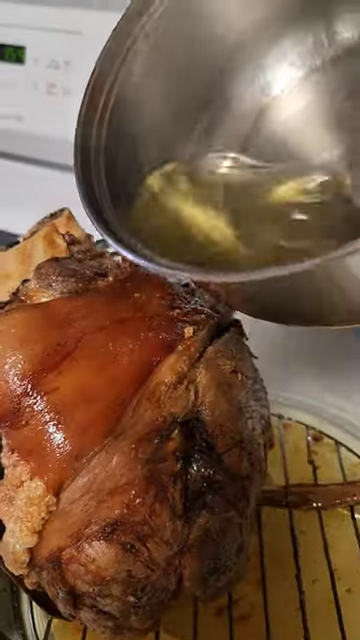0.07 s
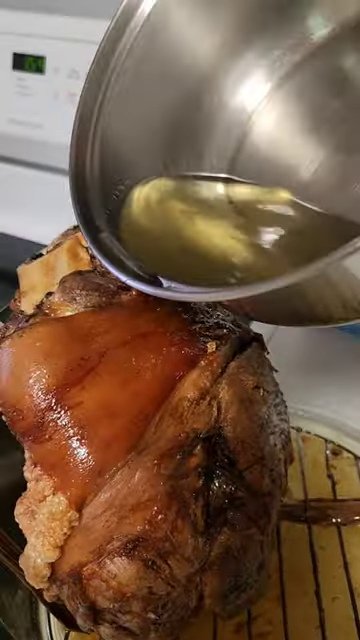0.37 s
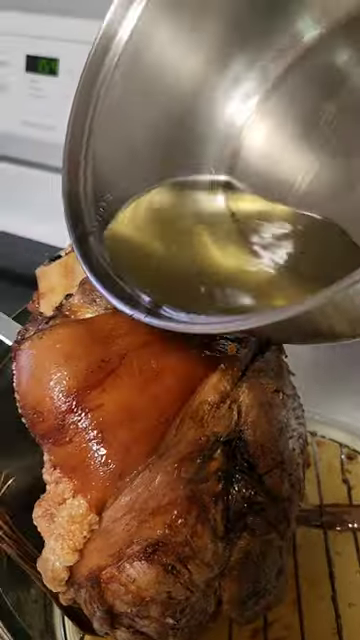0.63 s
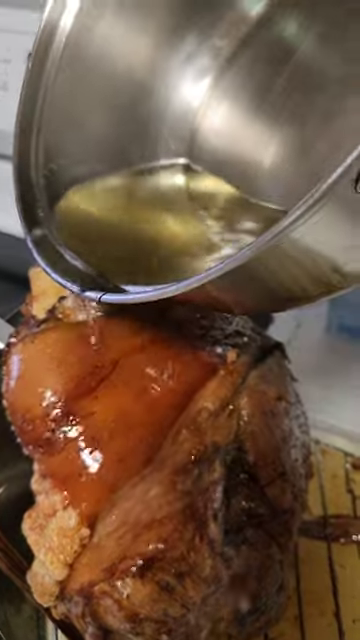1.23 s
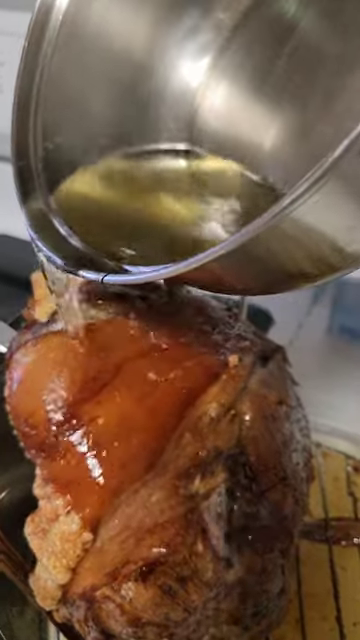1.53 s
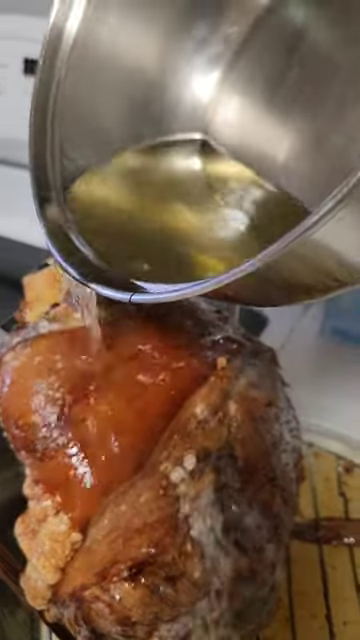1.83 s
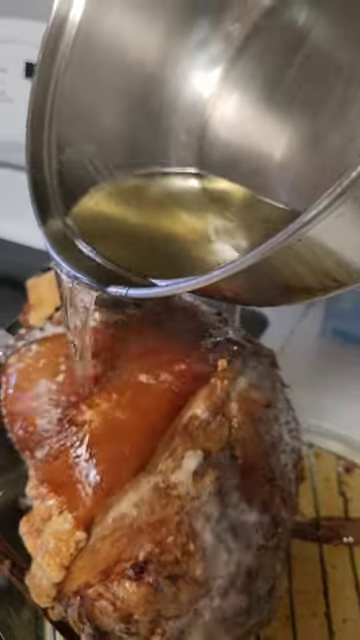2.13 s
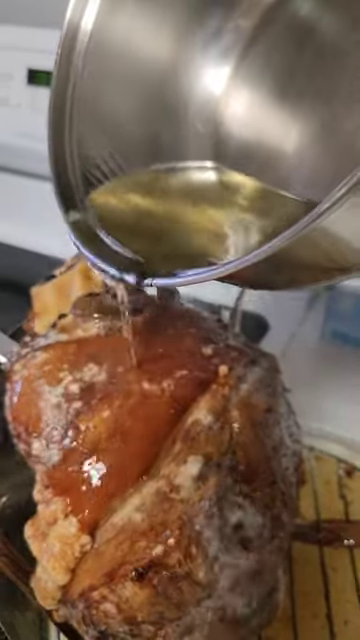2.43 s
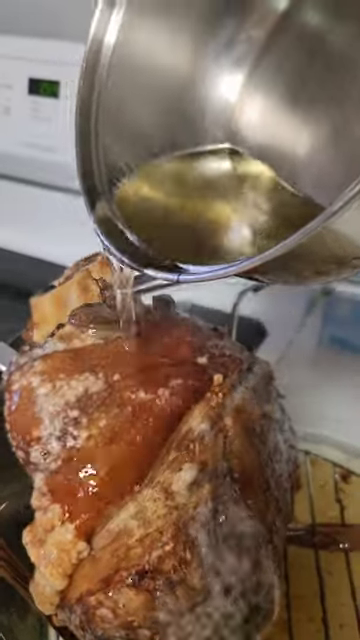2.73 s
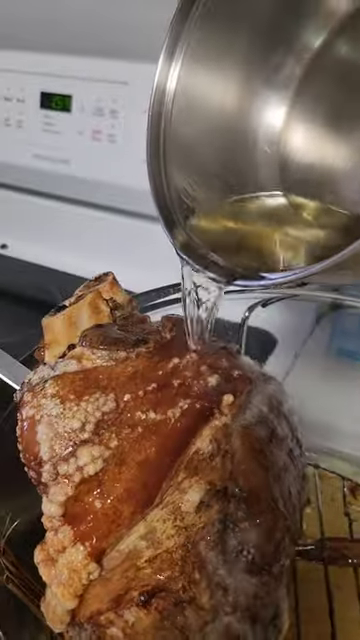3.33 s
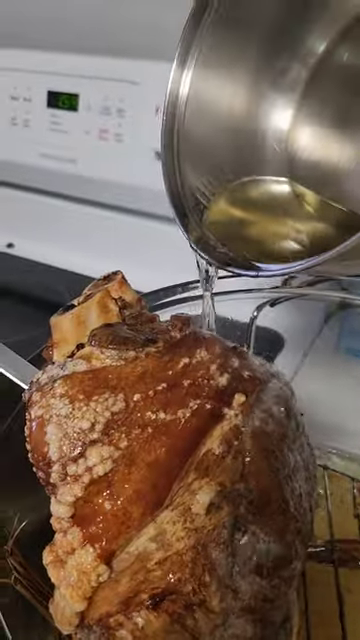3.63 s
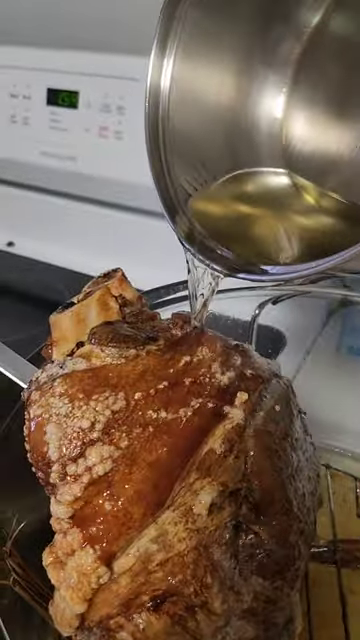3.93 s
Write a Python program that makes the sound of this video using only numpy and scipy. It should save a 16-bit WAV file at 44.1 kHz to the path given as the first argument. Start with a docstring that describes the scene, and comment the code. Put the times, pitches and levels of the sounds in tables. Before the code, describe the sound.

Close, bright sizzle and popping as hot oil is poured over roast pork skin.

```python
"""Hot oil on roast pork

Hot oil is poured from a steel pot over roast pork, close to a phone in a small kitchen where an appliance
hums. A few drops spit, then the stream lands: moisture in the skin boils off as fizz, crackle and lower
pops, and the hollow of the pot resonates. Blisters crack, pockets of fat pop and air thuds on the
microphone. Near the end the level dips briefly."""
import sys
import numpy as np
from scipy import signal
from scipy.fft import rfft, irfft
from scipy.io import wavfile
from scipy.ndimage import uniform_filter1d

SR = 44100
rng = np.random.default_rng(int(sys.argv[2]) if len(sys.argv) > 2 else 0)


def int16_out(signal):
    """Quantize to a 16-bit WAV file."""
    q = np.round(np.clip(np.atleast_2d(signal).T, -1, 1) * 32767)
    wavfile.write(sys.argv[1], SR, q.astype(np.int16))


N = 176400
T = np.arange(N) / SR
ROOM_T60_S, PORT_LAG_S = .065, .0001  # reverberation time; later arrival at the left microphone port


def undb(db):
    """Amplitude ratio: a factor of ten for every 20 dB."""
    return 10 ** (np.asarray(db) / 20)


def unit(x):
    """Normalisation to an rms of 1."""
    return x / np.sqrt(np.mean(x ** 2))


def curve(table, column=1):
    """Linear interpolation of one column over time."""
    rows = np.array(table)
    return np.interp(T, rows[:, 0], rows[:, column])


def pan(left_db):
    """Constant-power panning: two gains from a left-right level difference."""
    gains = undb(np.array([[.5], [-.5]]) * left_db)
    return gains / np.sqrt(np.mean(gains ** 2, axis=0))


def drift(rate_hz):
    """Low-pass noise: a smooth random fluctuation of rms 1."""
    width = max(int(SR / rate_hz), 1)
    smoothed = uniform_filter1d(rng.standard_normal(N), width, mode="wrap")
    return unit(uniform_filter1d(smoothed, width, mode="wrap"))


def colour(x, points, size=8192):
    """Minimum-phase filtering through points of f/Hz, gain/dB."""
    hz, db = np.array(points).T
    f = np.arange(size // 2 + 1) * SR / size
    gain = undb(np.interp(np.log(f + 1), np.log(hz), db))
    cepstrum = irfft(np.log(gain))
    cepstrum[1:size // 2] *= 2  # folding makes the response causal
    response = irfft(np.exp(rfft(cepstrum[:size // 2], size)))
    return signal.fftconvolve(np.atleast_2d(x), response[None], axes=1)[:, :N]


def kitchen(x, echo_db, t60_s=ROOM_T60_S, onset_s=.00055, spots=6, block=128):
    """Diffuse reflection from stove and walls: each spot on the roast has its own decaying response."""
    t = T[:N // 16]
    decay = np.exp(-np.log(1000) * t / t60_s) * np.clip(t / onset_s, 0, 1)
    active_spot = np.repeat(rng.integers(0, spots, N // block + 1), block)[:N]
    echo = 0
    for spot in range(spots):
        tail = rng.standard_normal((2, len(t))) * decay / np.sqrt(np.sum(decay ** 2))
        share = np.sin(np.pi / 2 * uniform_filter1d(1. * (active_spot == spot), block))
        echo = echo + signal.oaconvolve(x * share, tail, axes=1)[:, :N]
    return x + undb(echo_db) * echo


# Spectral density of the appliance's air noise: f/Hz, relative level/dB
AIR_SPECTRUM = [(15, -28), (25, -10.5), (48, -4.5), (74, -8), (110, 0.5), (155, -4.5), (200, -16.5),
                (264, -15), (335, -25), (382, -22.5), (440, -31.5), (569, -25.5), (761, -34), (1440, -31.5),
                (1820, -35.5), (2200, -35.5), (3500, -43), (4400, -41), (5500, -49), (6600, -46.5),
                (8000, -57), (10000, -58), (14000, -73)]
# Side signal of that noise relative to the mid signal: f/Hz, level/dB
AIR_SIDE = [(60, -18), (130, -16.5), (300, -11.5), (1000, 0), (3000, 0)]
# Motor partials: f/Hz, relative level/dB
MOTOR_PARTIALS = [(125, -35.5), (376, -56.5), (742, -63.5)]
# Envelope of air and motor together: t/s, gain/dB
HUM_ENVELOPE = [(0, -0.5), (0.7, 0.5), (1.6, -0.5), (2.5, 0.5), (3.5, 1.5), (3.63, -2.5), (3.66, -7),
                (4, -3)]


def appliance(air_db=-29.5):
    """Broadband air noise plus a motor's line spectrum, wavering in amplitude and phase."""
    mid, side = unit(colour(rng.standard_normal((2, N)), AIR_SPECTRUM))
    air = undb(air_db) * (mid + np.array([[1], [-1]]) * colour(side, AIR_SIDE))
    motor = 0
    for hz, db in MOTOR_PARTIALS:
        amplitude = np.sqrt(2) * undb(db + 3.0 * drift(2.7))
        motor = motor + amplitude * np.sin(2 * np.pi * hz * T + 1.26 * drift(8.4))
    return (air + motor) * undb(curve(HUM_ENVELOPE)) * pan(left_db=2.5)


# First drops: t/s, duration/s, level/dB
SPITS = [(0.061, .035, -54), (0.284, .048, -52), (0.5065, .0025, -28), (0.603, .016, -46.5),
         (0.639, .003, -50), (0.719, .003, -38), (0.795, .05, -50), (0.8545, .006, -20), (0.864, .02, -37),
         (0.885, .005, -28)]
# Spectrum of their hiss: f/Hz, relative level/dB
SPIT_SPECTRUM = [(1000, -17), (3000, -13), (6000, -7), (9000, -3.5), (13000, 0), (15500, 0)]


def spits(attack_share=.3, release_share=.3):
    """Flash boiling: each stray drop gives a short, bright hiss that decays exponentially."""
    envelope = 0
    for start, length, db in SPITS:
        attack = np.clip((T - start) / (attack_share * length), 0, 1)
        release = np.exp(-np.maximum(T - start - length, 0) / (release_share * length))
        envelope = envelope + undb(db) * attack * release
    hiss = unit(colour(rng.standard_normal((2, N)), SPIT_SPECTRUM))
    return kitchen(envelope * hiss, echo_db=-10)


def bursts(times, hz, gains, q, scatter, lags_s, scatter_s=.00065, size=256):
    """Damped resonators, each excited by an impulse and its glancing echoes from meat and pot."""
    snap = scatter * rng.standard_normal((len(times), 2, size)) * np.exp(-T[:size] / scatter_s)
    snap[:, :, 0] = 1  # direct sound
    f = np.arange(size // 2 + 1) * SR / size
    s = 1j * f / hz[:, None]
    resonance = s / q / (1 + s / q + s * s)
    wave = irfft(rfft(snap) * resonance[:, None])
    wave /= np.sqrt((wave ** 2).sum(axis=2).mean(axis=1))[:, None, None]  # unit energy
    channels = []
    for side, arrivals in enumerate((times + lags_s, times)):
        samples = (np.abs(arrivals) * SR).astype(int)[:, None] + np.arange(size)
        pressure = wave[:, side] * gains[side][:, None]
        channels.append(np.bincount(samples.ravel(), pressure.ravel(), N)[:N])
    return np.array(channels)


def bubbles(count, centre_hz, octaves, q, spread_db, cap_db=12.5, width_db=5):
    """Shot noise of steam bubbles; a level spread gives many weak bursts and a few strong ones."""
    when, rank = rng.random((count, 2)).T
    pitch, place = rng.standard_normal((count, 2)).T
    hz = centre_hz * 2 ** (octaves * pitch)
    gains = undb(np.minimum(-spread_db * np.log(rank), cap_db)) * pan(width_db * place)
    lags_s = PORT_LAG_S - .00006 * place  # bubbles lie at different angles to the ports
    return unit(bursts(when * N / SR, hz, gains, q, scatter=.24, lags_s=lags_s))


def pot(x, hz=757, q=9.8, ring_db=10):
    """Cavity resonance: the hollow of the steel pot rings with the frying."""
    return x + undb(ring_db) * signal.lfilter(*signal.iirpeak(hz, q, fs=SR), x)


# Boiling of the skin, in relative levels: t/s, fizz level/dB, crackle level/dB, pop level/dB
BOILING = [(0.88, -39.5, -49, -47), (0.92, -29, -33, -46.5), (1.0, -26, -49, -43.5),
           (1.12, -30, -34.5, -43), (1.25, -27.5, -34, -46.5), (1.41, -29.5, -37.5, -43),
           (1.49, -30.5, -40, -38.5), (1.57, -31.5, -36.5, -46.5), (1.71, -29, -36.5, -46),
           (1.74, -28, -30, -40), (1.95, -21, -30, -42.5), (2.12, -26, -30.5, -41), (2.25, -26.5, -29, -40),
           (2.45, -23, -33.5, -37.5), (2.58, -26, -37.5, -46), (2.76, -23.5, -30, -38.5),
           (3.03, -24.5, -32.5, -42), (3.23, -21.5, -28, -37.5), (3.36, -23, -47, -36.5),
           (3.48, -21.5, -27, -37), (3.55, -26, -34, -39), (3.635, -19.5, -36.5, -34.5),
           (3.66, -23.5, -43, -36.5), (3.85, -26.5, -38.5, -40.5), (4.0, -26, -32, -36)]
# Spectral shaping of the frying: f/Hz, gain/dB
FRYING_RESPONSE = [(250, -3.5), (400, 5), (500, 3.5), (610, -5.5), (920, -5), (1300, 2), (2100, 1.5),
                   (2550, -2), (2900, 0.5), (3200, 2.5), (4000, 0), (4800, 1.5), (6000, -2.5), (7300, -1.5),
                   (10000, -4), (12500, -0.5), (15500, 3.5)]


def frying(lands_s=.825, spreads_s=.059, flutter_db=1.2):
    """Boiling: three bubble swarms add incoherently and flutter as the oil runs over fresh skin."""
    fizz = bubbles(count=5500, centre_hz=7700, octaves=.18, q=1.65, spread_db=0)
    crackle = bubbles(count=1800, centre_hz=4500, octaves=.38, q=1.6, spread_db=2.5)
    pops = bubbles(count=1800, centre_hz=1560, octaves=.7, q=.88, spread_db=3)
    fizz *= undb(curve(BOILING, column=1) - 2 + flutter_db * drift(135))
    crackle *= undb(curve(BOILING, column=2) + flutter_db * drift(68))
    pops *= undb(curve(BOILING, column=3) + 3.5)
    wetted = np.clip((T - lands_s) / spreads_s, 0, 1)
    sizzle = (fizz + crackle + pops) * undb(.33 * drift(47)) * wetted
    return colour(pot(kitchen(sizzle, echo_db=-3.5)), FRYING_RESPONSE)


# Bursting blisters: t/s, relative level/dB, f/Hz, left-right difference/dB
BLISTERS = [(0.9213, -21, 6300, -1), (0.9817, -20, 8000, 0), (0.9935, -20, 6700, 0), (1.0614, -21, 6100, 1),
            (1.1708, -21, 3400, 0), (1.1786, -11.5, 7500, -1), (1.2614, -19.5, 6800, 3),
            (1.2886, -19, 11000, 0), (1.3493, -22, 4700, -1), (1.3815, -15.5, 4700, -2),
            (1.4184, -22.5, 7000, -1), (1.4607, -13, 3800, -2), (1.478, -18, 5900, -2),
            (1.538, -22, 7400, -1), (1.5777, -21, 8000, -2), (1.7482, -18, 4700, 0), (1.7868, -14, 4000, 5),
            (1.7998, -18, 4900, 3), (1.842, -20, 3800, -2), (2.1022, -17, 7500, -2), (2.145, -20, 4500, -2),
            (2.2055, -14, 4200, 1), (2.2228, -14, 5700, 0), (2.2465, -19, 6700, -1), (2.2567, -13, 4200, 1),
            (2.2884, -17, 4300, 1), (2.3154, -18, 7800, 2), (2.3995, -15, 5100, 1), (2.4454, -18, 5300, -1),
            (2.492, -11, 7000, 3), (2.6283, -19, 9800, 4), (2.7197, -16, 3700, 1), (2.8684, -17, 5800, 2),
            (2.9902, -18, 5700, -2), (3.0022, -18, 7300, 1), (3.0718, -20, 5600, 1), (3.3346, -16, 6100, 1),
            (3.3404, -15, 2400, 0), (3.3522, -17, 5400, -2), (3.3804, -15, 7400, -4),
            (3.5129, -18, 4900, 3), (3.6443, -16, 6000, 6), (3.7698, -21, 6500, -1),
            (3.7971, -18, 6000, -4), (3.8779, -19, 6000, -8), (3.9146, -16, 7000, -6),
            (3.9836, -17, 5200, -5)]


def blisters():
    """Impulsive rupture: each blister tears open in about a millisecond with a broadband crack."""
    times, db, hz, left_db = np.array(BLISTERS, float).T
    gains = 8 * undb(db + 2) * pan(left_db)
    cracks = bursts(times, hz, gains, q=.85, scatter=.42, lags_s=PORT_LAG_S / 2)
    return kitchen(cracks, echo_db=-5, t60_s=.035)


def puffs(table, rise_cycles):
    """Pressure pulses: each puff of gas drives the air for a cycle or two under a Gaussian envelope."""
    pressure = 0
    for start, hz, db, left_db in table:
        cycles = np.maximum(T - start, 0) * hz
        swell = np.exp(-(cycles / rise_cycles - 1) ** 2)
        pressure = pressure + undb(db) * pan(left_db) * np.sin(2 * np.pi * cycles) * swell
    return pressure


# Larger pockets of fat popping: t/s, f/Hz, level/dB, left-right difference/dB
FAT_POPS = [(1.0609, 1600, -22, 2), (1.1707, 1680, -9.5, 0), (1.4606, 1200, -17, -1),
            (2.2055, 1000, -20, 1), (2.2228, 1500, -19, 0), (2.5238, 1300, -20, -12),
            (2.5337, 1300, -19, -20), (2.5697, 1800, -21, 1), (2.7197, 1200, -18, 1),
            (2.8105, 1900, -19, -3), (3.1481, 1800, -21, -1), (3.2375, 1600, -19, 3),
            (3.3315, 1100, -19, 0), (3.3345, 480, -21, -2), (3.3403, 750, -16, 0), (3.7311, 1800, -18, 0)]


def fat_pops():
    """Sudden expansion: a pocket of fat releases gas and radiates a pulse into the room."""
    return kitchen(puffs(FAT_POPS, rise_cycles=.7), echo_db=-9)


# Air striking the microphone: t/s, f/Hz, level/dB, left-right difference/dB
THUDS = [(2.315, 115, -14, -9), (2.523, 125, -14, -14), (3.334, 95, -14, -1), (3.6368, 330, -16, -16),
         (3.643, 400, -23, -10)]


def thuds():
    """Local pressure: air pushes directly on the microphone, giving dull pulses without echo."""
    return puffs(THUDS, rise_cycles=.85)


def dip(start_s=3.6455, depth_db=-6, recovery_s=.03):
    """Transient attenuation: the gain drops abruptly after the last thud and recovers exponentially."""
    return undb(depth_db * (T > start_s) * np.exp(-np.abs(T - start_s) / recovery_s))


def scene():
    """Superposition: all sources add, and the dip acts on their sum."""
    return (frying() + blisters() + fat_pops() + spits() + thuds() + appliance()) * dip()


# Frequency response of the right microphone port: f/Hz, gain/dB
RIGHT_PORT_RESPONSE = [(300, 1), (1300, -1.5), (2400, 0), (6300, 0), (8300, 6), (10000, 5), (12000, 1),
                       (13300, 3), (15500, 10)]


def record(dry, cutoff_hz=15700):
    """Transducer response: the right port lifts the treble, then peaks are clipped and the top is cut."""
    heard = np.clip(np.vstack([dry[0], colour(dry[1], RIGHT_PORT_RESPONSE)]), -1, 1)
    low_pass = signal.ellip(10, .2, 70, cutoff_hz, fs=SR, output="sos")
    return signal.sosfilt(low_pass, heard)


dry = scene()
out = record(dry)
int16_out(out)
```